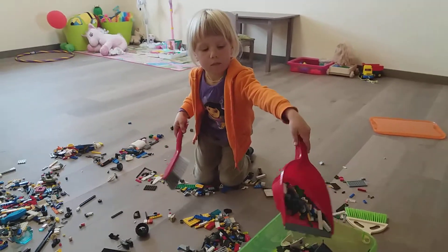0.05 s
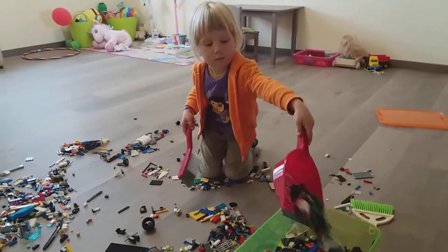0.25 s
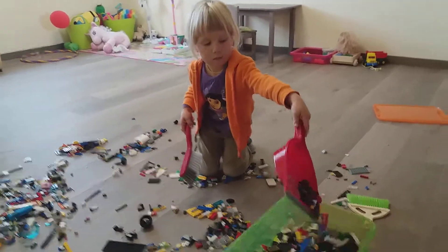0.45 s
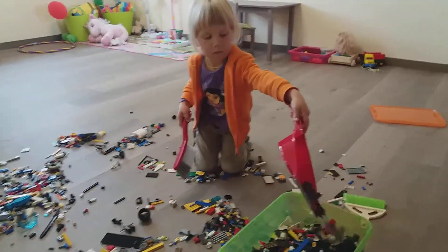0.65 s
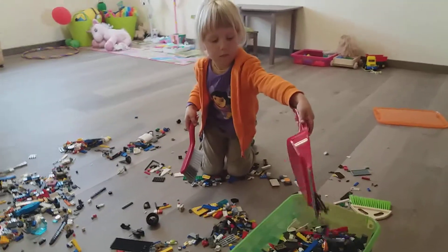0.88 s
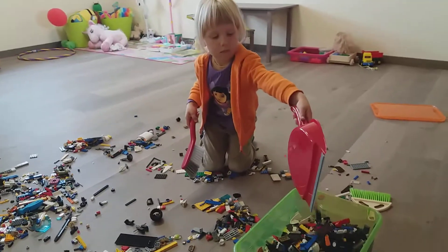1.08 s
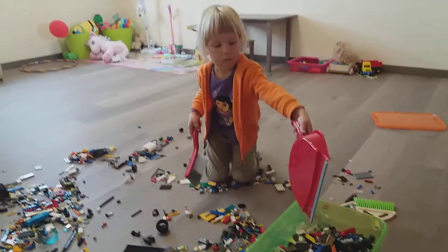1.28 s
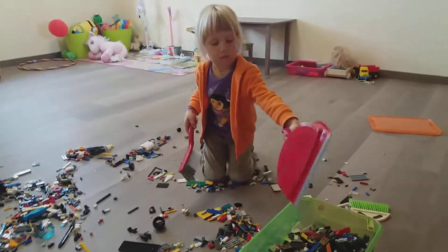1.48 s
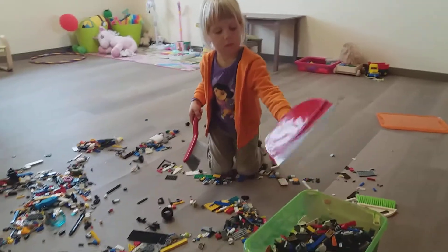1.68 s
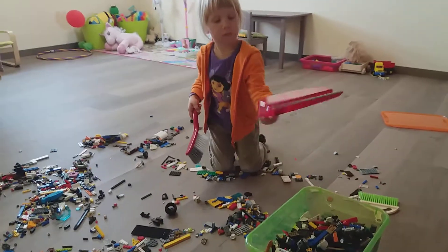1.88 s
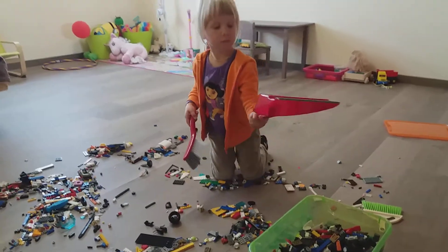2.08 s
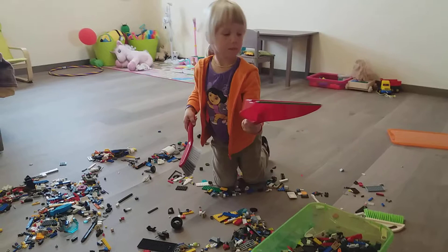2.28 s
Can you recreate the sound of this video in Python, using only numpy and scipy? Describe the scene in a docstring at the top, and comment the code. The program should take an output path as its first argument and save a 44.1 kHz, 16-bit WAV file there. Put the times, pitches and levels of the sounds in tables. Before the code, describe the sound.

Small plastic bricks slide off a dustpan into a half-full plastic bin in a room. The bright clatter swells, two clumps land with hollow thumps, then the last bricks click down one by one, with a slight echo.

```python
"""Plastic bricks poured into a bin

Small bricks slide off a dustpan into a half-full plastic bin in a bare playroom. Each contact rings a
brick, knocks the pile and drums on the bin. Two clumps land with a thump, then the last bricks click
down one by one. A low hum and a faint rustle remain."""
import sys
import numpy as np
from scipy import signal
from scipy.fft import rfft, irfft, next_fast_len
from scipy.io import wavfile
from scipy.ndimage import uniform_filter1d

SR = 44100
rng = np.random.default_rng(int(sys.argv[2]) if len(sys.argv) > 2 else 0)


def master_out(mix):
    """Clip the mix to full scale and print it as 16-bit PCM to the path in sys.argv[1]."""
    frames = np.transpose(np.atleast_2d(mix))
    ceiling = np.clip(frames, -1, 1)
    pcm = np.round(ceiling * 32767).astype(np.int16)
    wavfile.write(sys.argv[1], SR, pcm)


N = 108045
T = np.arange(N) / SR
HIT_S = np.arange(SR // 8) / SR  # time axis of one impact
ATTACK_S = .00024


def amp(db):
    """Decibels to gain."""
    return 10 ** (np.asarray(db) / 20)


def unit(x):
    """Scale to rms 1."""
    return x / np.sqrt(np.mean(x ** 2) + 1e-20)


def fade(t, t60):
    """Exponential decay, 60 dB down at t60."""
    return np.exp(-np.log(1000) * t / np.maximum(t60, 1e-4))


def along(points, hz):
    """Interpolate (frequency, value) points on a log axis."""
    points_hz, values = np.transpose(points)
    return np.interp(np.log(hz + 1), np.log(points_hz + 1), values)


def curves(rows):
    """One value per sample for each column after the time."""
    times_s, *columns = np.transpose(rows)
    return [np.interp(T, times_s, column) for column in columns]


def filtered(x, response):
    """Apply a frequency response."""
    size = next_fast_len(len(x) + SR // 4)
    return irfft(rfft(x, size) * response(np.fft.rfftfreq(size, 1 / SR)), size)[:len(x)]


def coloured(x, colour):
    """Apply a (frequency, gain) table."""
    return filtered(x, lambda hz: amp(along(colour, hz)))


def noise(colour, size=len(HIT_S)):
    """Coloured noise, rms 1."""
    return unit(coloured(rng.standard_normal(size), colour))


def add(track, start_s, sound):
    """Mix a sound into a track."""
    part = track[max(0, round(start_s * SR)):][:len(sound)]
    part += sound[:len(part)]


def steadied(x, size=SR // 22):
    """Even out the slow level, keep the single clicks."""
    power = np.abs(uniform_filter1d(uniform_filter1d(x ** 2, size), size))
    return x / np.sqrt(power + .001 * power.mean())


# room noise spectrum (frequency [Hz], density [dB])
AMBIENT_COLOUR = [(25,-24), (55,1), (90,-7), (180,0), (240,-10), (400,-20), (700,-19.5), (1100,-19.5),
                  (2500,-24), (6800,-29.5), (8200,-39), (16000,-32)]
def room_tone(noise_db=-59.5, hum_hz=111.3, hum_db=-61):
    """Steady room noise and a low hum."""
    return amp(noise_db) * noise(AMBIENT_COLOUR, N) + amp(hum_db) * np.sin(2 * np.pi * hum_hz * T)


# rustle spectrum (frequency [Hz], density [dB])
RUSTLE_COLOUR = [(300, -15.5), (700, -6), (1100, -0.5), (1700, -5.5), (2600, -14.5), (5000, -18),
                 (8000, -25.5), (15000, -26.5)]
def rustle(start_s=2.088, rise_s=.0131, level_db=-58, fall_db_per_s=21):
    """A faint, flickering rustle after the pour."""
    since_s = np.maximum(T - start_s, 0)
    envelope = np.minimum(since_s / rise_s, 1) * amp(level_db - fall_db_per_s * since_s)
    hiss = noise(RUSTLE_COLOUR, N)
    flicker_db = 1.65 * unit(uniform_filter1d(rng.standard_normal(N), size=400))
    return envelope * hiss * amp(flicker_db)


# thud spectrum (frequency [Hz], density [dB])
THUD_COLOUR = [(25, -23.5), (50, 2), (68, 8), (100, -14), (200, -43), (600, -80)]
# thuds in the floor (time [s], level [dB], rise [s], t60 [s])
THUDS = [(0.863, -52.5, .004, .3), (1.599, -57, 0.089, 0.76)]
def floor_thuds():
    """Faint, dull thuds in the floor."""
    out = np.zeros(N)
    for start_s, db, rise_s, t60_s in THUDS:
        envelope = np.minimum(T / rise_s, 1) * fade(T, t60_s)
        add(out, start_s, amp(db) * noise(THUD_COLOUR, N) * envelope)
    return out


# room decay (frequency [Hz], t60 [s])
ROOM_DECAY = [(150, 0.35), (400, 0.79), (1000, 0.67), (4500, 0.51), (8000, 0.55), (15000, 0.16)]
def echo(early_db=-8.5, early_t60_s=.023, tail_db=-6, build_s=.004):
    """Impulse response: quick echoes off the bin and floor, then the room's tail."""
    hz, frame_s, spectrum = signal.stft(rng.standard_normal(SR // 2), SR, nperseg=256)
    decay = fade(frame_s, along(ROOM_DECAY, hz)[:, None])
    _, tail = signal.istft(spectrum * decay, SR, nperseg=256)
    t = np.arange(len(tail)) / SR
    tail *= 1 - np.exp(-t / build_s)
    early = rng.standard_normal(len(t)) ** 3 * fade(t, early_t60_s) * (t > .001)
    return amp(tail_db) * tail / np.linalg.norm(tail) + amp(early_db) * early / np.linalg.norm(early)


def room(x, size=4096):
    """Bricks land in ever new places, so each block gets new echoes."""
    out, hop = np.zeros(N + size), size // 2
    padded = np.pad(x, (hop, size))
    for start in range(0, N, hop):
        block = padded[start:start + size] * np.hanning(size)
        add(out, start / SR, signal.fftconvolve(block, echo()))
    return out[hop:hop + N]


# bin resonances (frequency [Hz], width [Hz], gain [dB])
BIN_MODES = [(120.7, 13, -13.5), (186, 37, -15.5), (243, 47, -9), (300.6, 26, 0), (353, 36, 0.5),
             (401.3, 79, -5.5), (605, 290, -14)]
def bin_response(hz, lowcut_hz=130):
    """The bin's floor and walls resonate but radiate little bass."""
    modes = sum((-1) ** k * amp(db) * 1j * hz * width_hz / (mode_hz ** 2 - hz ** 2 + 1j * hz * width_hz)
                for k, (mode_hz, width_hz, db) in enumerate(BIN_MODES))
    return (1j * hz / (lowcut_hz + 1j * hz)) ** 2 * modes


# wall slap spectrum (frequency [Hz], density [dB])
SLAP_COLOUR = [(30, -47), (100, -23.5), (200, -10.5), (550, -4.5), (780, 1), (1120, 3), (1400, -13),
               (2200, -7.5), (4000, -20.5), (12000, -17.5)]
# blows on the bin (time [s], level [dB], boom [Hz], relative slap [dB])
BIN_BLOWS = [(.003, -38, 348, -8), (0.034, -40, 340, -24), (0.4572, -13.5, 301, 1), (0.568, -20.5, 324, -5),
             (.747, -36, 353, 7.5), (.829, -33, 420, 6), (0.8562, -14, 392, -5), (.866, -33.5, 426, 14.5),
             (1.005, -32.5, 324, -22), (1.14, -34.5, 432, -5), (1.4805, -41.5, 947, -5.5),
             (1.681, -44.5, 336, -11)]
def bin_thumps(boom_peak_s=.0045, slap_t60_s=.045):
    """Bricks strike the loaded bin: it booms for a few cycles and its wall slaps."""
    out = np.zeros(N)
    boom_envelope = (HIT_S / boom_peak_s * np.exp(1 - HIT_S / boom_peak_s)) ** 2
    slap_envelope = fade(HIT_S, slap_t60_s) * (1 - np.exp(-HIT_S / ATTACK_S))
    for start_s, db, hz, slap_db in BIN_BLOWS:
        boom = np.sin(2 * np.pi * hz * HIT_S) * boom_envelope
        slap = amp(slap_db) * noise(SLAP_COLOUR) * slap_envelope
        add(out, start_s, amp(db) * (boom + slap))
    return out


# pile knock spectrum (frequency [Hz], density [dB])
PILE_COLOUR = [(60, -59), (200, -23.5), (450, -7.5), (600, -4.5), (800, 1), (1100, 2.5), (1400, -2),
               (2100, 0), (3000, -0.5), (5000, -4.5), (12000, -31.5)]
def pile_knock(t60_s=.033):
    """A knock on the pile: a short burst of noise."""
    return noise(PILE_COLOUR) * fade(HIT_S, t60_s)


# modes of a brick (frequency [Hz], level [dB], t60 [s])
BRICK_MODES = [(2530, -7, .018), (3490, 4.5, 0.0077), (4000, -5, 0.053), (4352, 1.5, 0.02),
               (4780, -4.5, 0.057), (5715, 1, 0.024), (6850, 2.5, 0.04), (7284, -3, 0.046),
               (8800, -5, 0.023), (10060, 2, 0.02), (12100, -4.5, 0.048), (14420, -4, .014)]
def brick(rattle_width_hz=0, size_spread=.0421, mode_spread_db=5.5, crack_db=5.5, crack_t60_s=.0076):
    """A brick of random size cracks and rings; rattling against neighbours widens its modes."""
    hz, db, t60_s = np.transpose(BRICK_MODES)[:, :, None]
    size, strength, phase = rng.standard_normal((3, len(BRICK_MODES), 1))
    hz = hz * np.exp(size_spread * size)
    gains = amp(db + mode_spread_db * strength)
    rattle = np.cumsum(rng.standard_normal(len(HIT_S))) * np.sqrt(2 * np.pi * rattle_width_hz / SR)
    modes = np.sin(2 * np.pi * (hz * HIT_S + phase) + rattle) * fade(HIT_S, t60_s)
    ring = (gains * modes).sum(0) / np.linalg.norm(gains)
    crack = amp(crack_db) * rng.standard_normal(len(HIT_S)) * fade(HIT_S, crack_t60_s)
    return (ring + crack / 2) / (1 + amp(crack_db))


# colour of the bricks' ring (frequency [Hz], gain [dB])
RING_EQ = [(100, -43.5), (800, -5), (2000, -1.5), (3500, 5), (7000, 0), (8200, -1), (12000, 0.5),
           (16000, -8.5)]
def bright(ring):
    """Small bricks ring with much treble and little bass."""
    return coloured(ring, RING_EQ)


# edge snap spectrum (frequency [Hz], density [dB])
SNAP_COLOUR = [(2000, -23), (6000, -9), (9000, 3), (12500, -5), (16000, 1.5)]
# single bricks (time [s], level [dB], main mode [Hz], relative mode [dB], knock [dB], snap [dB])
LANDINGS = [(.0608,-40.5,5870,4.5,4.5,-22), (.1545,-48,5670,-6,-6,-20), (.172,-33,3280,-5,-20,-8.5),
            (.2205,-35,10400,5,-10,-12.5), (.2533,-33,4360,8,-16,-15), (.2698,-23,5660,5,2.5,-17.5),
            (0.3064,-21.5,7090,6,-24.5,-15.5), (0.342,-21,7000,-2,-1,4.5), (.4,-14.5,6950,-0.5,-4,5),
            (.407,-17.5,7140,1,-23,2), (.428,-23,7270,7,-12,-14.5), (.482,-25,4260,8,-10,-16.5),
            (.5646,-20,3290,-6,2,-1.5), (.571,-21.5,5130,-1,5,-4), (0.698,-30,11130,3,-16,-2),
            (0.7132,-20,4295,-2.5,-1,-0.5), (.8283,-21.5,7080,-20,-2.5,2.5), (0.863,-32.5,4240,-8,-15,5),
            (0.901,-22.5,4000,-19,-12,-3), (1.0071,-20,3620,-24,-1.5,-7.5), (1.0844,-32,4130,-8,-2,-6.5),
            (1.1493,-27.5,6860,6,-18,-18), (1.1542,-25.5,3620,-7,-9,-2), (1.170,-24,3150,-10,-8.5,-7.5),
            (1.2396,-22.5,7530,0,-15,-7), (1.241,-29.5,4780,-4,-16,-13), (1.2475,-30,8720,6.5,-27,-1),
            (1.2575,-26,4110,-5,-25,-7), (1.2635,-26,12100,6.5,-16,8), (1.2895,-22,6450,-14,-21.5,-8.5),
            (1.294,-34.5,6470,8.5,-14,-7.5), (1.332,-27,4640,-11,-11,-5), (1.3927,-28.5,7650,1,-16,-12),
            (1.424,-49,12850,10,-8.5,-8), (1.4398,-49,9700,9.5,-14,-8), (1.4811,-33.5,4120,-4,1.5,-6),
            (1.4832,-37.5,7660,6.5,-5,-10.5), (1.5148,-33,7740,2,-22,-8.5), (1.518,-36,4940,0,-6,-3),
            (1.5410,-32.5,6850,6.5,-16,-14.5), (1.5415,-37,3570,0,-14,-14.5), (1.575,-43,8800,0,-16,2),
            (1.6028,-37.5,4130,-6,-12,-11), (1.6135,-47,4880,2.5,-10.5,-3.5), (1.6482,-49,2430,1,-16,-0.5),
            (1.6757,-27,6650,-7.5,-16,-7.5), (1.676,-38.5,2604,-0.5,-14,-14),
            (1.685,-32.5,4200,-13,-28.5,-16.5), (1.7729,-48.5,4660,-3,-17,-12)]
def clicks(trim_db=1.5, mode_t60_cycles=184, snap_peak_s=.0019):
    """Single bricks stand out: a ring with one main mode, a knock on the pile, a hard edge's snap."""
    out = np.zeros(N)
    attack = 1 - np.exp(-HIT_S / ATTACK_S)
    snap_envelope = HIT_S / snap_peak_s * np.exp(1 - HIT_S / snap_peak_s)
    for start_s, db, hz, mode_db, knock_db, snap_db in LANDINGS:
        mode = amp(mode_db) * np.sin(2 * np.pi * hz * HIT_S) * fade(HIT_S, mode_t60_cycles / hz)
        knock = amp(knock_db) / 2 * pile_knock()
        snap = amp(snap_db) / 2 * noise(SNAP_COLOUR) * snap_envelope
        ring = 2 * bright(brick(rattle_width_hz=119))
        add(out, start_s, amp(db + trim_db) * ((ring + mode + knock) * attack + snap))
    return out


# flow of bricks (time [s], contacts [1/s])
CONTACT_RATE = [(0, 560), (.17, 1300), (.3, 2100), (.55, 1670), (.9, 1025), (1.3, 600), (1.5, 340),
                (1.9, 353)]
# pour levels before trim (time [s], brick ring [dB], pile clatter [dB], bin drumming [dB])
POUR_LEVELS = [(0,-53.5,-56.5,-48.5), (.14,-66,-55.5,-70), (.19,-43,-39,-50.5), (.26,-29,-33.5,-51.5),
               (.32,-24.5,-26.5,-46), (.39,-21.5,-28,-39.5), (.45,-23.5,-27,-35), (.5,-21.5,-28,-30.5),
               (.58,-26.5,-31,-40), (.66,-30,-35.5,-47.5), (.79,-30.5,-34.5,-47), (.82,-35.5,-44,-48.5),
               (.89,-30.5,-30,-36.5), (.97,-39.5,-45,-44), (1.06,-38.5,-47.5,-58), (1.17,-37.5,-41,-49.5),
               (1.33,-39,-49.5,-56), (1.45,-53,-62,-60), (1.57,-51.5,-65,-57), (1.66,-54,-71.5,-61.5),
               (1.7,-48,-58,-62.5), (1.79,-50.5,-57.5,-62.5), (1.88,-78.5,-92.5,-75.5)]
def pour(brick_count=48, spread_db=4.5, ring_trim_db=-.5, bin_trim_db=1.5, top_hz=7100, top_db_per_db=.16):
    """Random contacts: each rings one of many bricks, knocks the pile and drums on the bin."""
    rate_per_s, = curves(CONTACT_RATE)
    contacts = rng.random(N) < rate_per_s / SR
    strength = amp(spread_db * np.minimum(rng.standard_normal(N), 2))
    which_brick = rng.integers(brick_count, size=N)
    blows = contacts * strength * rng.choice([-1, 1], N)
    ring, pile = np.zeros((2, N))
    for k in range(brick_count):
        own_blows = blows * (which_brick == k)
        ring += signal.oaconvolve(own_blows, brick())[:N]
        pile += signal.oaconvolve(own_blows, pile_knock())[:N]
    ring_db, pile_db, bin_db = curves(POUR_LEVELS)
    ring = steadied(bright(ring))
    top = filtered(ring, lambda hz: 1 - 1 / (1 + (hz / top_hz) ** 8))
    ring += top * (amp(top_db_per_db * (ring_db - ring_db.max())) - 1)  # gentler fall, less treble
    drumming = steadied(filtered(blows, bin_response))
    return (amp(ring_db + ring_trim_db) * ring + amp(pile_db) * steadied(pile)
            + amp(bin_db + bin_trim_db) * drumming)


def scene(thump_send_db=-3.5):
    """Falling bricks and the bin in the room, mono."""
    bricks = pour() + clicks()
    thumps = bin_thumps()
    echoes = room(bricks + amp(thump_send_db) * thumps)
    return (bricks + thumps + echoes + floor_thuds() + rustle() + room_tone())[None]


def record(dry, lowcut_hz=65, top_hz=16100):
    """A small microphone: no deep bass, nothing above the band limit."""
    response = lambda hz: (1j * hz / (lowcut_hz + 1j * hz)) ** 2 * (hz < top_hz)
    return np.array([filtered(x, response) for x in dry])


dry = scene()
out = record(dry)
master_out(out)
```